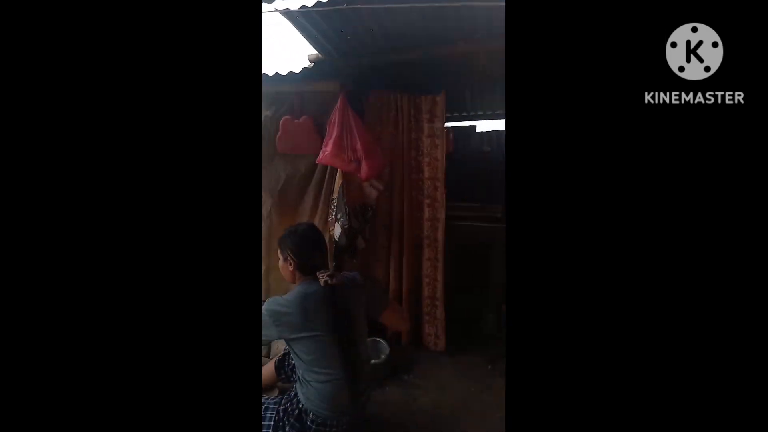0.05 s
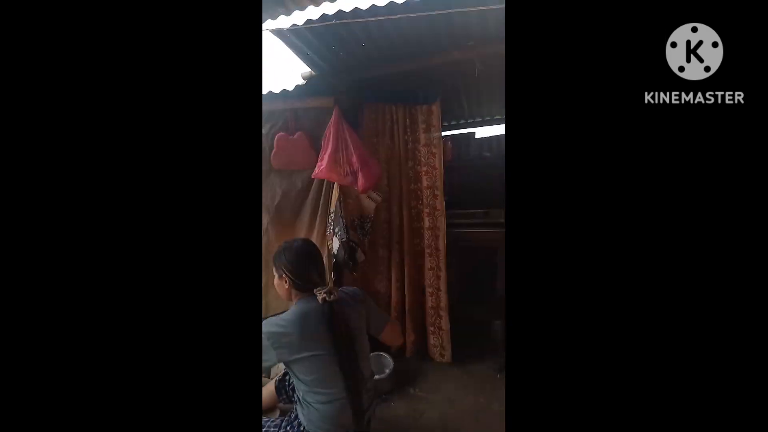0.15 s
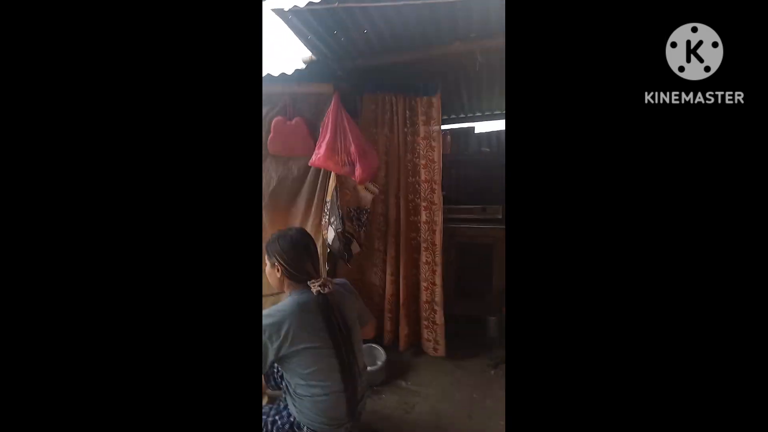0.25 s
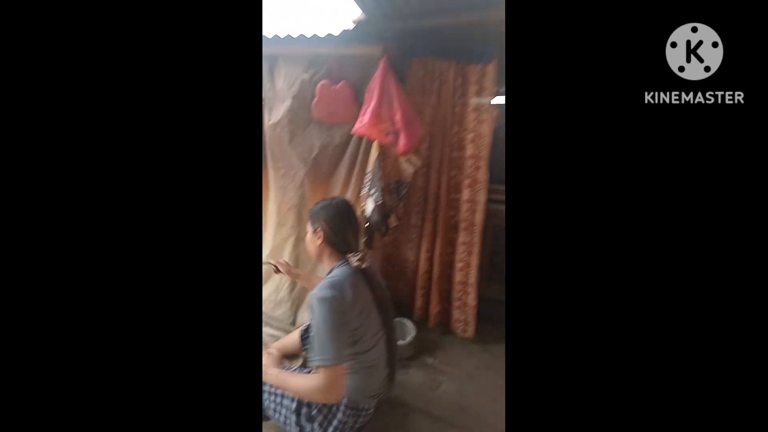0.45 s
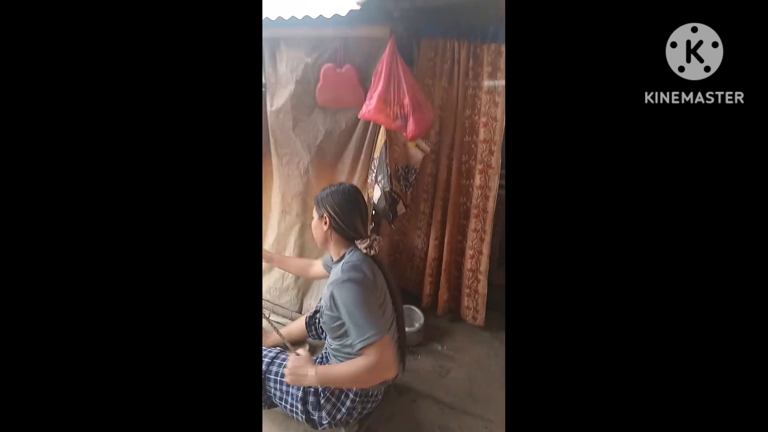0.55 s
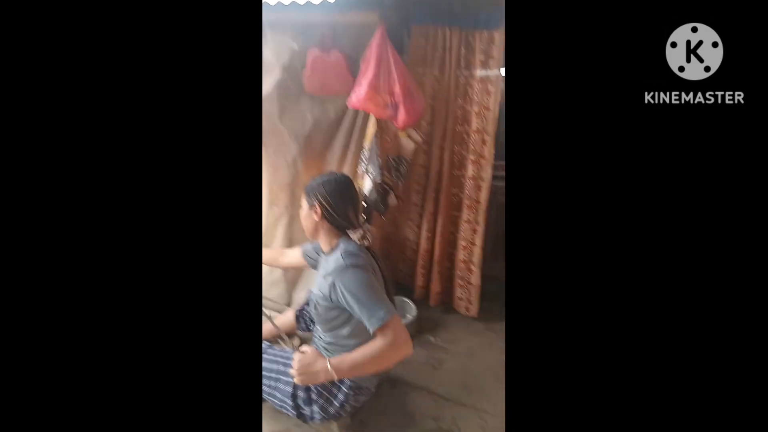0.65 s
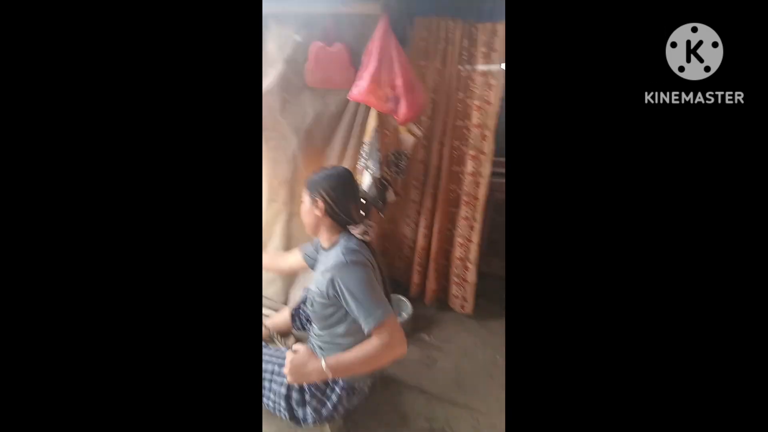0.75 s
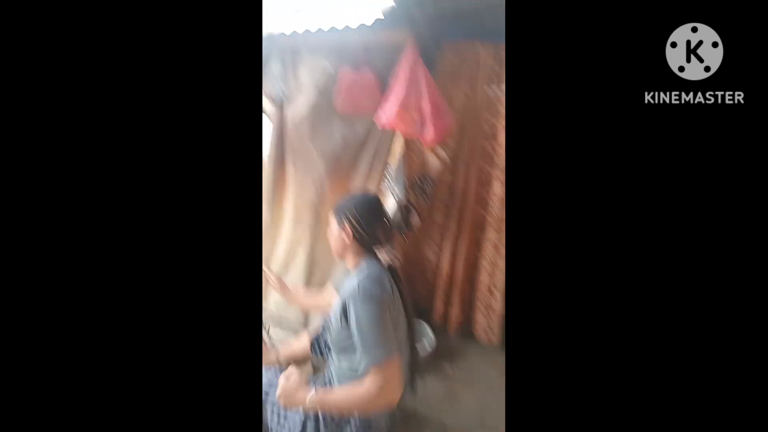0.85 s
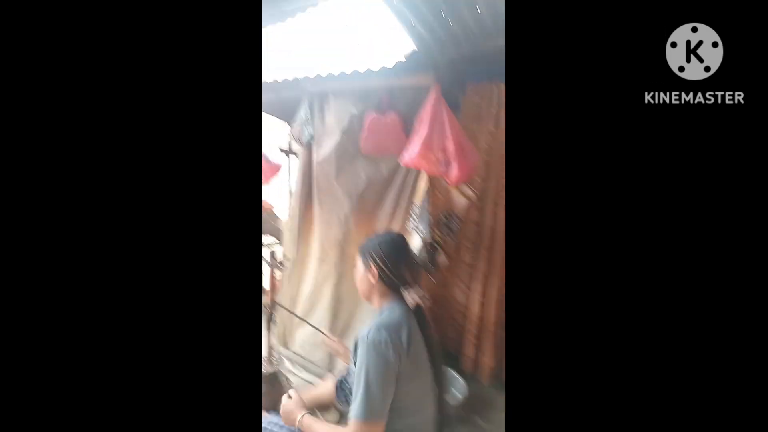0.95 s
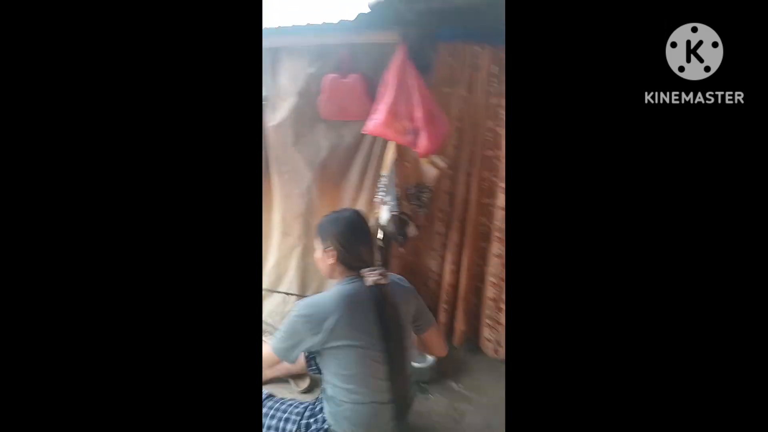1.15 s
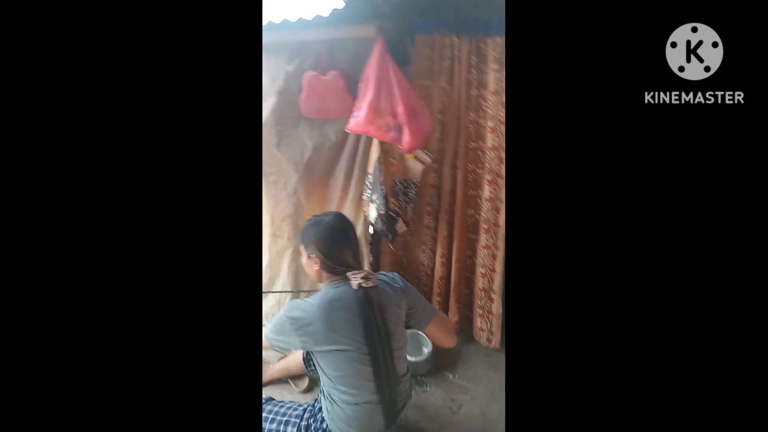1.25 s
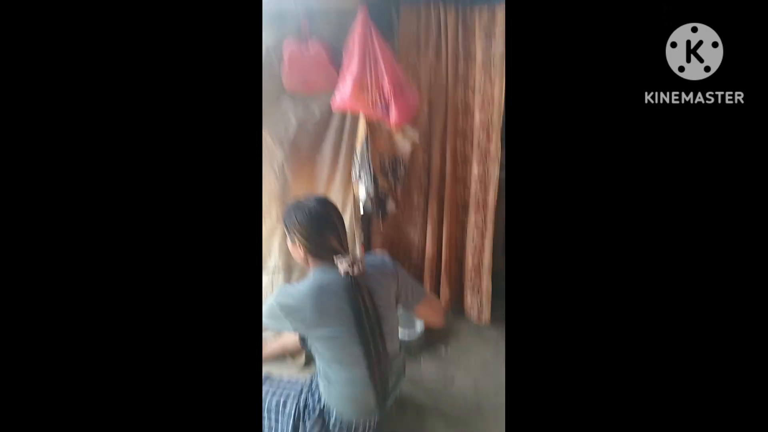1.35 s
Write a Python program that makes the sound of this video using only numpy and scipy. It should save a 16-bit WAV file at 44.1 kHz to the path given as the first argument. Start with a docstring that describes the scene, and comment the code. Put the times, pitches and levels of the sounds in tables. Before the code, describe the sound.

Churning liquid sloshes twice in a deep container, gulping and bubbling with a light splash on top. A paddle knocks the wall during each stroke, and a few drops tick near the microphone in a small shed.

```python
"""Two swells of hollow gurgling with spray on top: liquid churned in a deep vessel inside a shed.
Tumbling bubbles ring the vessel, the heaving liquid rumbles, and the surface crackles and squirts.
Large air pockets gulp, tiny bubbles ping, the paddle knocks and a few drops tick.
A faint thin tone lingers as the next stroke begins."""
import sys
import numpy as np
from scipy import signal
from scipy.fft import rfft, irfft, next_fast_len
from scipy.io import wavfile
from scipy.ndimage import uniform_filter1d, map_coordinates

SR = 44100
rng = np.random.default_rng(int(sys.argv[2]) if len(sys.argv) > 2 else 0)


def unload_audio(sound):
    """Save the sound as a 16-bit wav file, at the path given as the first command line argument."""
    columns = np.transpose(np.atleast_2d(sound))
    # keep every value between -1 and 1, then stretch to whole-number steps
    steps = np.round(np.clip(columns, -1, 1) * 32767)
    wavfile.write(sys.argv[1], SR, steps.astype(np.int16))


N = 61739

# tone colour of each noisy layer: frequency_hz, level_db
BACKGROUND_EQ = [(70,7.5),(200,-36),(540,-10),(5000,-49),(10000,-16.5),(13000,-39)]
RUMBLE_EQ = [(38,-27),(62,-5.5),(85,0.5),(135,-2),(300,-39)]
SPLASH_EQ = [(500,11),(950,-1.5),(1400,0.5),(2400,-2.5),(3400,0),(5000,-40)]
SPRAY_EQ = [(2000,-37),(3600,-0.5),(5200,-1.5),(6700,0.5),(10200,2.5),(12800,-15.5),(15500,-24)]
HOLLOW_EQ = [(250,-22),(380,0),(650,3.5),(900,-5.5),(2500,-38)]
DEEP_EQ = [(90, -30), (170, 0.5), (330, 0.5), (450, -23), (1000, -32)]
# swells of the bass rumble, the hollow gurgle and the deep gurgle: time_s, level_db
RUMBLE_FADER = [(0,-56.5),(.2,-85),(.23,-49),(.36,-36),(.52,-47.5),(.575,-70),(.62,-58),(.7,-58),(.735,-84),(.81,-66),(.85,-37),(1.12,-44.5),(1.22,-72),(1.4,-69)]
HOLLOW_FADER = [(0,-53),(.05,-73.5),(.11,-59),(.245,-45.5),(.29,-35),(.475,-40),(.56,-51),(.68,-51),(.73,-65),(.785,-67),(.82,-45),(.875,-35.5),(1.08,-39.5),(1.15,-49),(1.18,-41),(1.33,-76.5),(1.4,-48)]
DEEP_FADER = [(.18, -83), (.2, -46.5), (.255, -46), (.285, -39), (.37, -37), (.445, -40), (.485, -39),
              (.53, -49.5), (.62, -64), (.785, -78), (.80, -53.5), (.85, -38), (.96, -35.5), (1.04, -35),
              (1.10, -44), (1.19, -50.5), (1.225, -75)]
# swells of the breaking surface: time_s, splash_db, spray_db
SURFACE_FADERS = [(0,-72.5,-68.5),(.05,-86,-87.5),(.11,-62.5,-61.5),(.16,-68,-66.5),(.265,-57,-52.5),(.29,-43.5,-49.5),(.37,-41,-53),(.445,-47.5,-57),(.48,-41,-47),(.53,-54.5,-63.5),(.61,-62,-74.5),(.75,-75,-77),(.81,-67.5,-62.5),(.835,-54,-51),(.962,-39,-45.5),(1,-48.5,-57),(1.028,-39,-46),(1.065,-45,-57.5),(1.1,-51.5,-59),(1.2,-63,-74.5),(1.228,-55.5,-56),(1.295,-80,-88),(1.36,-59,-55.5),(1.4,-50.5,-45.5)]
# path of the faint whistle: time_s, pitch_hz, level_db
THIN_TONE = [(1.2, 1400, -76), (1.24, 1410, -67), (1.31, 1377, -66.5), (1.4, 1363, -64.5)]
# stray drops: start_s, plop_db, plop_hz, tick_db, tick_hz, swell_s
DROPS = [(0.0961, -49, 2430, -40.5, 7200, 0.00047), (0.1004, -41.5, 2350, -33.5, 7100, 0.00021),
         (0.1185, -66, 2400, -55, 5600, .0005), (0.1342, -29.5, 2080, -30, 6900, 0.00019),
         (0.1462, -69, 2400, -31.5, 8950, 0.00021), (.5742, -37, 2630, -51, 6500, 0.00057)]
# jets of liquid: start_s, pitch_hz, width_hz, level_db, length_s
SQUIRTS = [(0.144,1520,163,-52.5,0.35),(0.308,5300,3950,-43,.019),(.456,2900,500,-37,.011),(0.367,7840,4740,-47.5,0.028),(0.826,6850,7200,-44.5,0.012),(0.953,6900,7000,-40.5,0.014),(1.045,2470,700,-46,.014)]
# heaviest shoves of the liquid: start_s, pitch_hz, level_db
SHOVES = [(.214,78,-38.5),(.289,114.8,-29.5),(.345,97.6,-28),(0.849,107.3,-30),(0.946,84.5,-27.5)]
# paddle strikes: start_s, level_db
KNOCKS = [(0.4646, -29), (0.4659, -18), (1.0265, -27), (1.2175, -39)]
# ring of the struck wall: pitch_hz, level_db, t60_s
WALL_MODES = [(628, 4.5, 0.015), (1443, -5.5, 0.0081), (1900, -7.5, 0.029), (2660, -13, 0.01),
              (6590, -5, 0.0061), (8880, -5, 0.0035)]
# tiny clear bubbles and large air pockets: start_s, pitch_hz, level_db, t60_s
PINGS = [(.238, 5220, -44.5, 0.072), (.546, 2700, -42, 0.049), (.636, 7200, -57, 0.053),
         (.708, 2330, -62.5, 0.14), (1.214, 1180, -43.5, 0.059), (1.224, 1965, -40.5, 0.041)]
GULPS = [(.191,587,-33.5,0.1),(.278,223.4,-19.5,0.056),(.299,564,-23,0.062),(.312,193,-23,0.092),(.349,303,-23.5,0.11),(.35,716,-22,0.049),(.405,630,-20.5,0.048),(.585,580,-37,0.048),(.642,597,-42,0.12),(.663,394,-39,0.13),(.676,564,-32,0.077),(.794,266,-30,0.061),(.803,474,-32.5,0.15),(.826,272,-22.5,0.052),(.912,178,-24.5,0.078),(.953,542.3,-22,0.14),(.971,181,-28.5,0.088),(1.017,574,-14.5,0.034),(1.022,713,-21.5,0.047),(1.04,184,-23,.06),(1.124,245,-27.5,0.032),(1.166,720,-33.5,0.092),(1.225,532.6,-44.5,0.21),(1.372,545,-40,0.15)]
# resonances of the vessel's air and walls, and of its bright mouth: pitch_hz, width_hz, level_db
VESSEL_MODES = [(191, 16, -2), (258, 13.5, -1), (317.2, 12.3, 5), (384, 30, 2), (484, 29, -5), (548, 48, 2),
                (616.3, 46, 0.5), (688, 130, -10.5), (797, 39, -14.5)]
MOUTH_MODES = [(1530, 73, -29), (1950, 42, 7), (2100, 32, 9.5), (2317, 42, 12), (2550, 128, 9.5),
               (2871, 20, 8.5)]


def amp(db):
    """Decibels to gain."""
    return 10 ** (np.asarray(db) / 20)


def unit(x):
    """Scaled to rms 1."""
    return x / np.sqrt(np.mean(x ** 2) + 1e-20)


def decay(t, t60_s):
    """A fade that loses 60 dB in t60_s."""
    return amp(-60 * t / t60_s)


def swell(t, peak_s):
    """A soft rise to 1 at peak_s, then a fall."""
    return (t / peak_s * np.exp(1 - t / peak_s)) ** 2


def curves(rows):
    """One value per sample for each column after the time."""
    times, *columns = np.transpose(rows)
    return [np.interp(np.arange(N) / SR, times, column) for column in columns]


def add(track, start_s, sound):
    """Mix a sound into the track at a time."""
    part = track[max(round(start_s * SR), 0):][:len(sound)]
    part += sound[:len(part)]


def filtered(x, response):
    """x times a complex response of frequency."""
    size = next_fast_len(N + SR // 2)
    return irfft(rfft(x, size) * response(np.fft.rfftfreq(size, 1 / SR)), size)[:N]


def equalise(x, eq):
    """x through an EQ curve, at rms 1."""
    hz, db = np.transpose(eq)
    return unit(filtered(x, lambda f: amp(np.interp(np.log(f + 1), np.log(hz), db))))


def resonate(x, modes):
    """x through a bank of resonances, at rms 1."""
    return unit(filtered(x, lambda f: sum(
        amp(db) * 1j * f * width / (hz * hz - f * f + 1j * f * width) for hz, width, db in modes)))


def patchy(x, depth_db):
    """x with random patches of gain in time and frequency, at rms 1."""
    spectrum = signal.stft(x, nperseg=512)[2]
    patches = uniform_filter1d(rng.standard_normal(spectrum.shape), size=6, axis=0)
    patches = unit(uniform_filter1d(patches, size=6, axis=1))
    return unit(signal.istft(spectrum * amp(depth_db * patches), nperseg=512)[1][:N])


def bubbles(count, low_hz, high_hz, cycles, spread_db, rise, samples):
    """An even stream of random bubbles, each a rising sine that loses 60 dB in `cycles`; rms 1."""
    when, pitch, strength = rng.random((count, 3)).T[:, :, None]
    start = ((np.arange(count)[:, None] + when) * N / count).astype(int)
    hz = low_hz * (high_hz / low_hz) ** pitch
    turns = hz * np.arange(samples) / SR
    age = turns / cycles
    ring = np.sin(2 * np.pi * turns * (1 + rise * np.minimum(age, 1) / 2)) * amp(-60 * age)
    gain = amp(spread_db * np.minimum(-np.log(1 - strength), 4))  # a few stand out
    return unit(np.bincount((start + np.arange(samples)).ravel(), (gain * ring).ravel())[:N])


def background():
    """A very quiet, steady bed of low noise and hiss."""
    return amp(-66.5) * equalise(rng.standard_normal(N), BACKGROUND_EQ)


def shed(x):
    """The shed walls answer with a short reverb."""
    t = np.arange(SR // 3) / SR
    tail = rng.standard_normal(len(t)) * decay(t, t60_s=0.15) * (1 - np.exp(-t / 0.00069))
    return signal.fftconvolve(x, tail / np.linalg.norm(tail))[:N]


def thin_tone():
    """A faint whistle fades in, sags in pitch and holds."""
    hz, db = curves(THIN_TONE)
    sounding = np.arange(N) / SR > THIN_TONE[0][0]
    return sounding * amp(db) * unit(np.sin(2 * np.pi * np.cumsum(hz) / SR))


def drops():
    """Stray drops land with a tick and a plop; the plop rings on for a moment."""
    out, t = np.zeros(N), np.arange(SR // 25) / SR
    for start_s, plop_db, plop_hz, tick_db, tick_hz, swell_s in DROPS:
        impact = swell(t, swell_s)
        ring = amp(-9) * (1 - np.exp(-t / swell_s)) * decay(t, t60_s=0.014)
        add(out, start_s, amp(plop_db) * (impact + ring) * np.sin(2 * np.pi * plop_hz * t))
        add(out, start_s, amp(tick_db) * impact * np.sin(2 * np.pi * tick_hz * t))
    return out


def squirts():
    """Liquid forced through a gap: a band of hiss that swells and dies."""
    out, t = np.zeros(N), np.arange(SR // 3) / SR
    for start_s, hz, width_hz, db, length_s in SQUIRTS:
        hiss = unit(filtered(rng.standard_normal(N), lambda f: 1 / (1 + (2 * (f - hz) / width_hz) ** 4)))
        add(out, start_s, amp(db) * swell(t, length_s / 2) * hiss[:len(t)])
    return out


def knocks(low_cut_hz=545, high_cut_hz=11000):
    """The paddle strikes the wet wall: a crack and a short ring with little bass."""
    out, t = np.zeros(N), np.arange(SR // 10) / SR
    ring = sum(amp(db) * decay(t, t60_s) * np.sin(2 * np.pi * hz * t) for hz, db, t60_s in WALL_MODES)
    for start_s, db in KNOCKS:
        crack = amp(-1.5) * np.exp(-t / 0.00031) * rng.standard_normal(len(t))
        add(out, start_s, amp(db) * (ring + crack))
    return filtered(out, lambda f: f ** 2 / (f ** 2 + low_cut_hz ** 2) / (1 + (f / high_cut_hz) ** 16))


def heave():
    """The mass of liquid rumbles against the vessel and now and then shoves it hard."""
    rumble_db, = curves(RUMBLE_FADER)
    rumble = bubbles(130, low_hz=33.7, high_hz=155.6, cycles=6.2, spread_db=1.5, rise=0, samples=6000)
    out = amp(rumble_db - 3.5) * equalise(rumble, RUMBLE_EQ)
    t = np.arange(SR // 6) / SR
    for start_s, hz, db in SHOVES:
        add(out, start_s, amp(db) * swell(t, peak_s=0.012) * np.sin(2 * np.pi * hz * t))
    return out


def splash(spurts_per_s=70, spurt_db=1.96):
    """The surface breaks into small bubbles and a crackling, tinkling spray that comes in spurts."""
    splash_db, spray_db = curves(SURFACE_FADERS)
    spurts = map_coordinates(rng.standard_normal(N), [np.arange(N) * spurts_per_s / SR])
    froth = bubbles(2400, low_hz=876, high_hz=3560, cycles=13.1, spread_db=2.5, rise=0.081, samples=900)
    wash = unit(froth + amp(-2) * rng.standard_normal(N))
    wash = equalise(wash + amp(-1) * resonate(froth, MOUTH_MODES), SPLASH_EQ)
    fizz = bubbles(2200, low_hz=3040, high_hz=12200, cycles=8.3, spread_db=0.5, rise=0.051, samples=300)
    fizz = equalise(fizz + amp(2.5) * rng.standard_normal(N), SPRAY_EQ)
    tinkle = bubbles(300, low_hz=4790, high_hz=10630, cycles=380, spread_db=7.5, rise=0.043, samples=3500)
    spray = unit(fizz + amp(-7) * tinkle)
    surface = amp(splash_db) * patchy(wash, depth_db=3) + amp(spray_db) * patchy(spray, depth_db=4.5)
    return amp(spurt_db * spurts) * surface


def air_pockets(pockets, rise, attack_s=0.0023):
    """Each air pocket, large or tiny, rings briefly, rising a little in pitch."""
    out, t = np.zeros(N), np.arange(SR // 4) / SR
    for start_s, hz, db, t60_s in pockets:
        envelope = (1 - np.exp(-t / attack_s)) * decay(t, t60_s)
        add(out, start_s, amp(db) * envelope * np.sin(2 * np.pi * hz * t * (1 + rise * t / t60_s)))
    return out


def gurgle():
    """Big bubbles tumble and ring the vessel; the deepest come in at the height of a stroke."""
    (hollow_db,), (deep_db,) = curves(HOLLOW_FADER), curves(DEEP_FADER)
    upper = bubbles(300, low_hz=363, high_hz=884, cycles=20.3, spread_db=2, rise=0.15, samples=2500)
    lower = bubbles(170, low_hz=165.2, high_hz=349, cycles=10, spread_db=1.5, rise=0.26, samples=3000)
    hollow = equalise(resonate(upper, VESSEL_MODES) + amp(-8) * upper, HOLLOW_EQ)
    deep = equalise(resonate(lower, VESSEL_MODES) + amp(-1) * lower, DEEP_EQ)
    return amp(hollow_db - 2) * hollow + amp(deep_db - 0.6) * deep


def scene():
    """The churn and a few close drops, both sent to the shed reverb, over a quiet bed."""
    churn = knocks() + gurgle() + heave() + splash() + squirts()
    churn += air_pockets(GULPS, rise=0.038) + air_pockets(PINGS, rise=0.018)
    drips = drops()
    reverb = shed(amp(-11.5) * churn + amp(-14) * drips)
    return (background() + reverb + thin_tone() + drips + churn)[None]


def record(dry):
    """The microphone keeps nothing above 15750 Hz."""
    return filtered(dry[0], lambda f: f < 15750)[None]


dry = scene()
out = record(dry)
unload_audio(out)
```